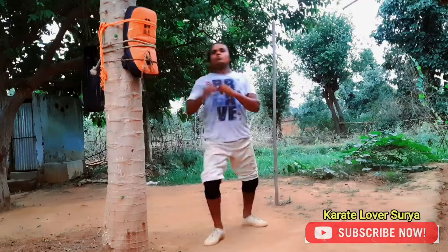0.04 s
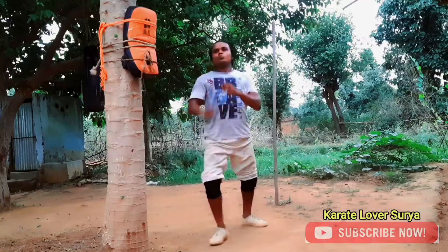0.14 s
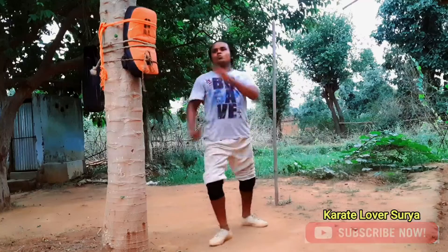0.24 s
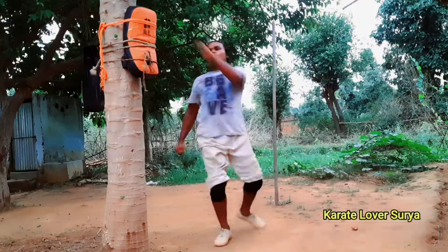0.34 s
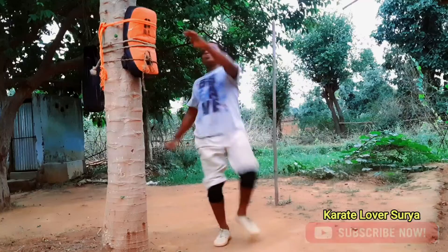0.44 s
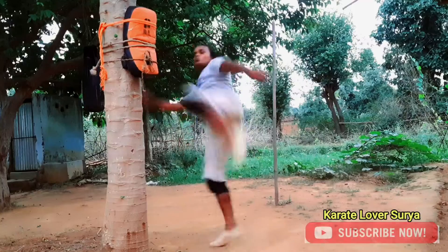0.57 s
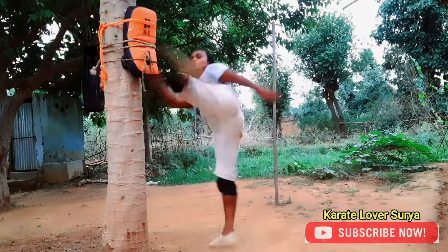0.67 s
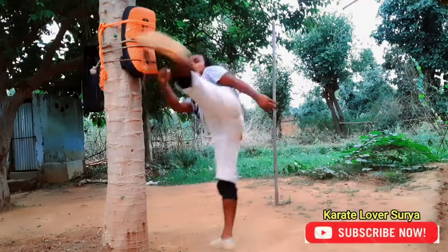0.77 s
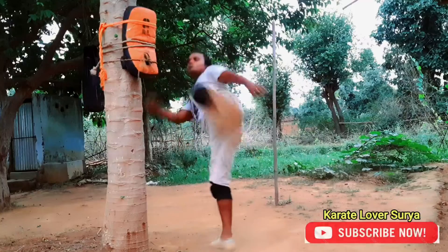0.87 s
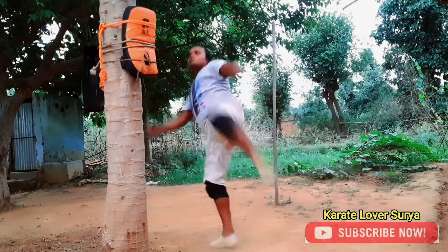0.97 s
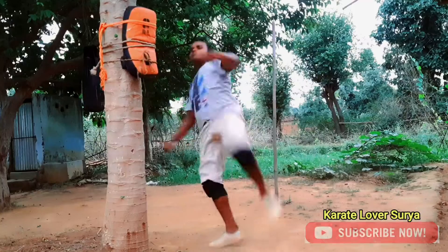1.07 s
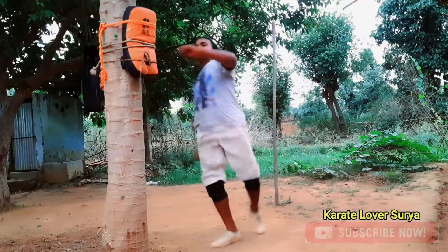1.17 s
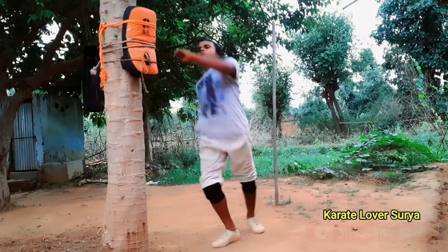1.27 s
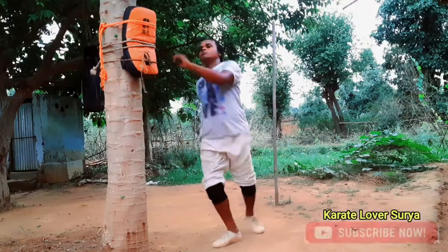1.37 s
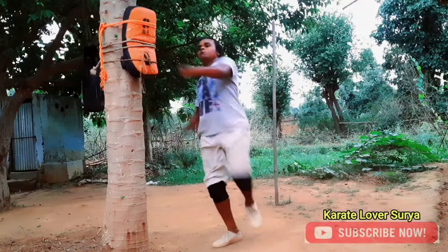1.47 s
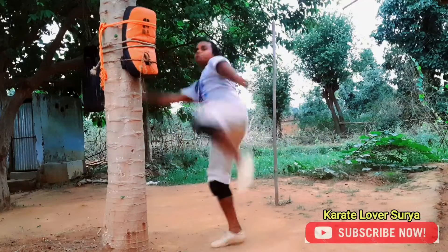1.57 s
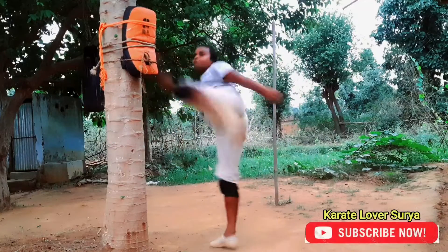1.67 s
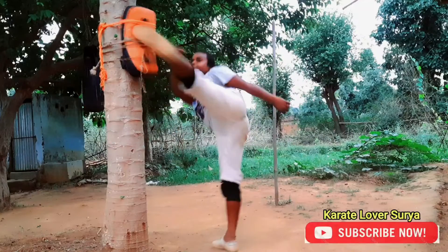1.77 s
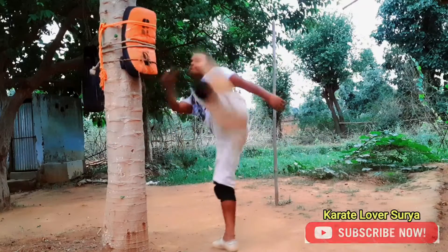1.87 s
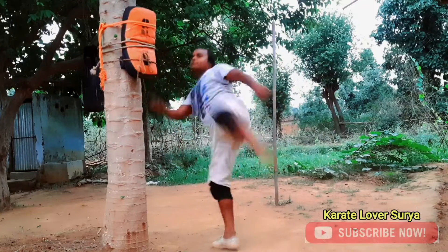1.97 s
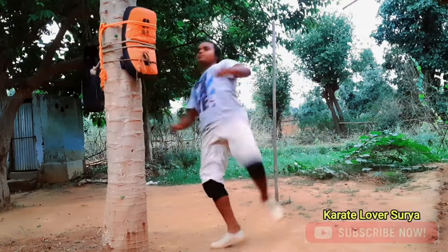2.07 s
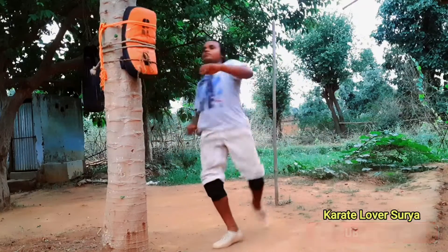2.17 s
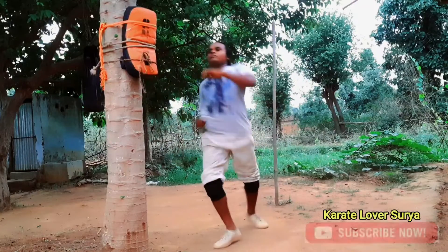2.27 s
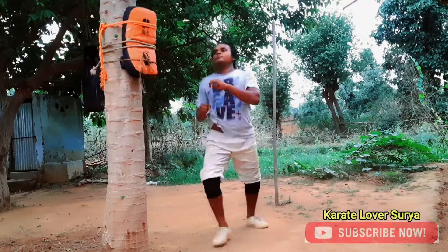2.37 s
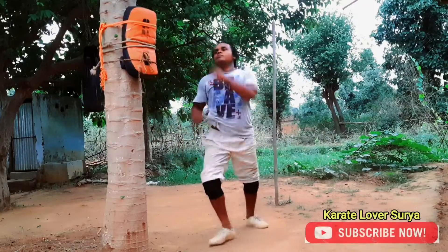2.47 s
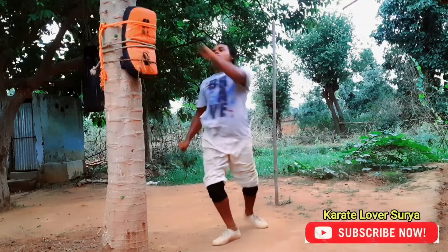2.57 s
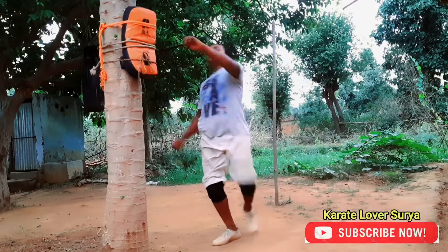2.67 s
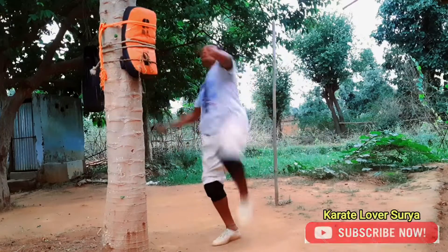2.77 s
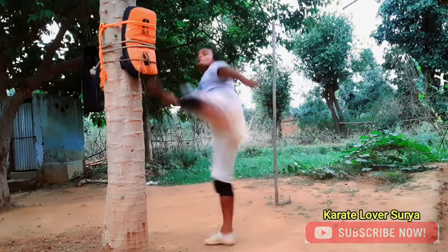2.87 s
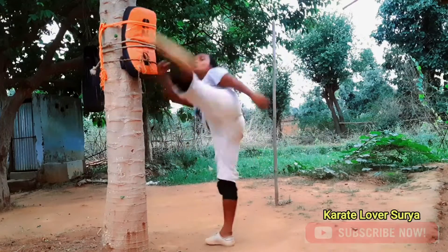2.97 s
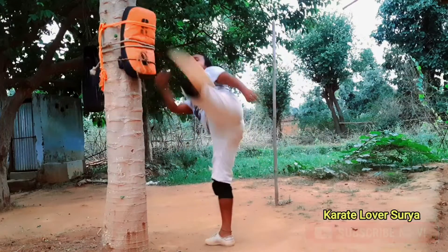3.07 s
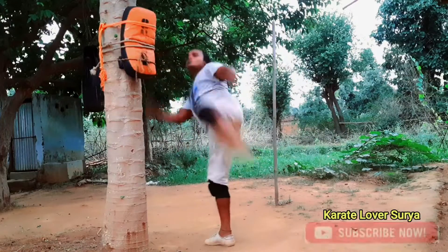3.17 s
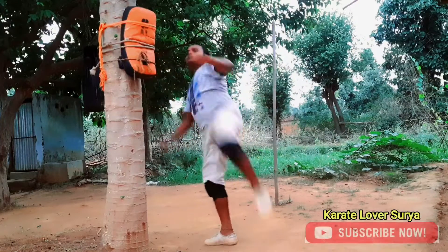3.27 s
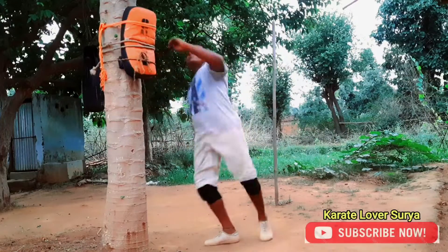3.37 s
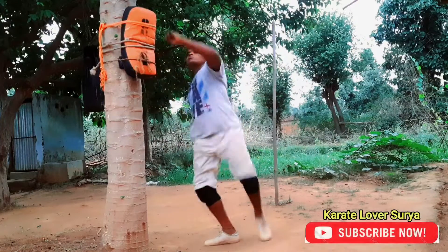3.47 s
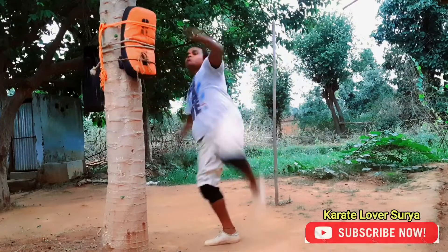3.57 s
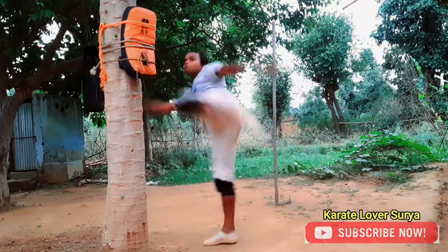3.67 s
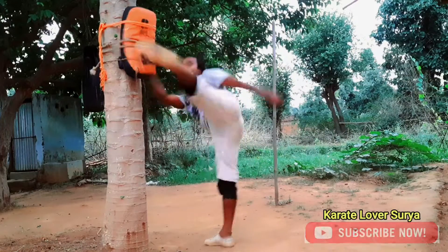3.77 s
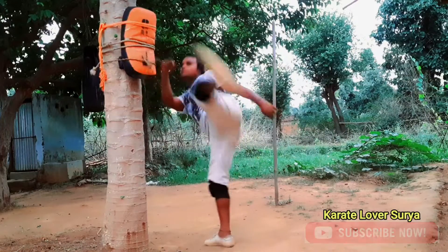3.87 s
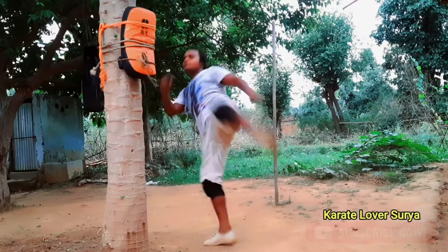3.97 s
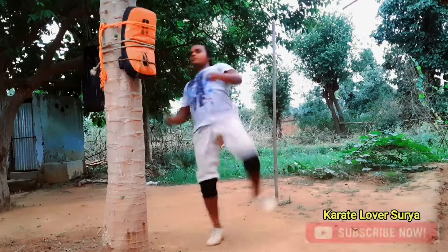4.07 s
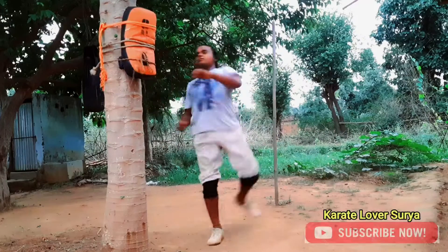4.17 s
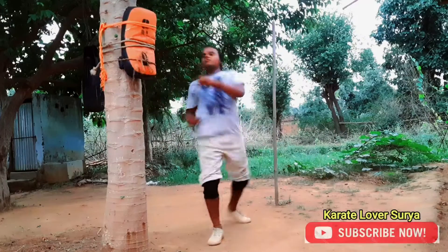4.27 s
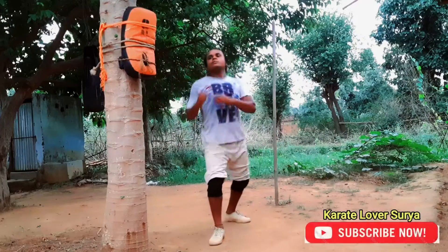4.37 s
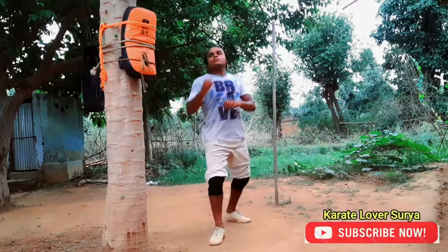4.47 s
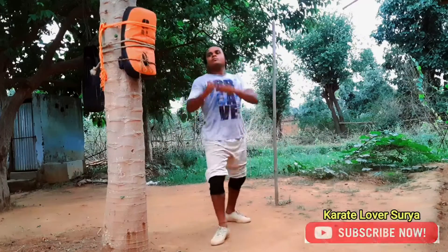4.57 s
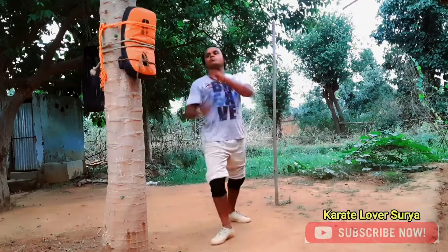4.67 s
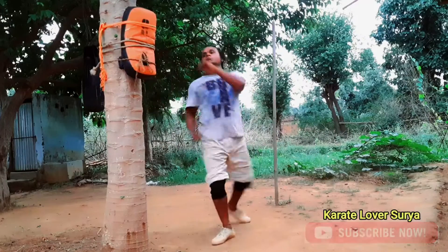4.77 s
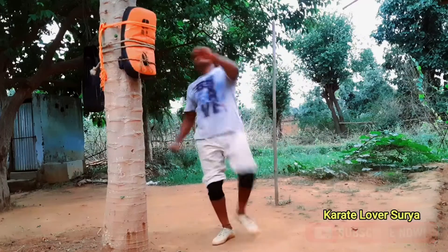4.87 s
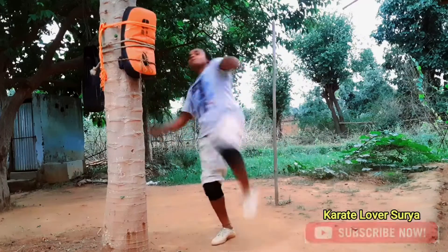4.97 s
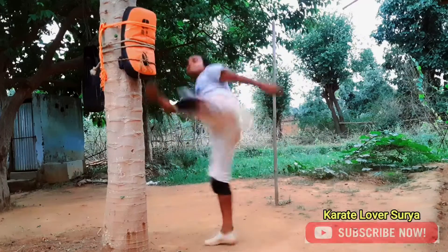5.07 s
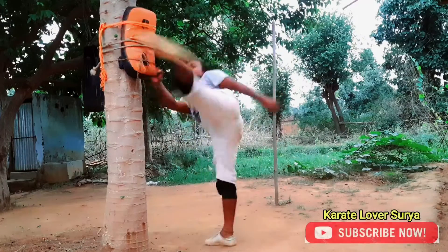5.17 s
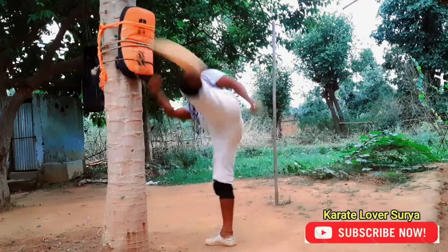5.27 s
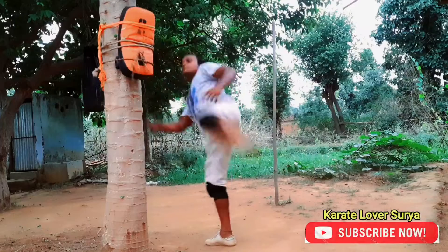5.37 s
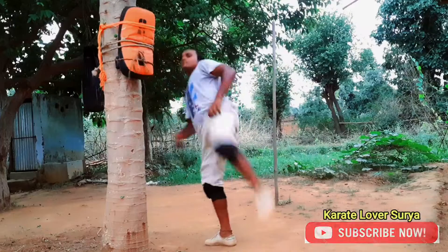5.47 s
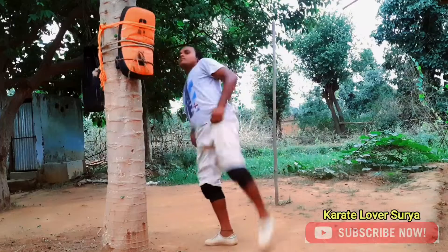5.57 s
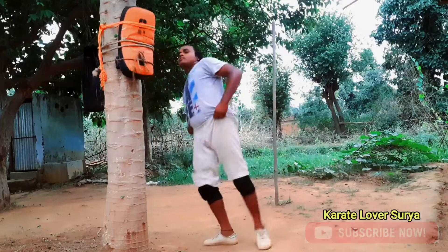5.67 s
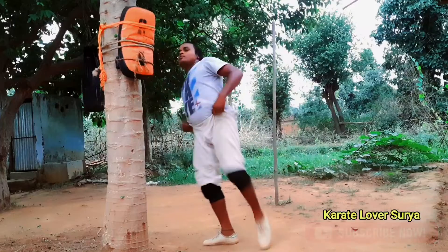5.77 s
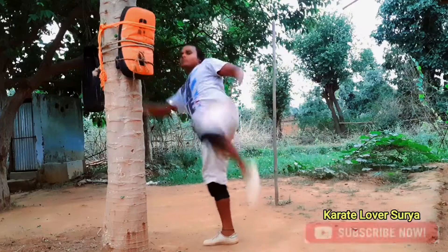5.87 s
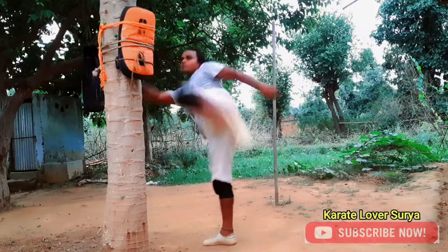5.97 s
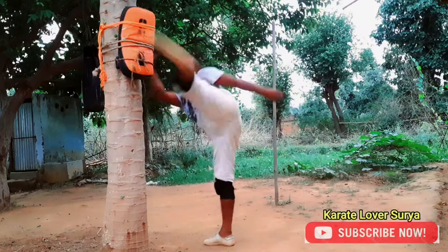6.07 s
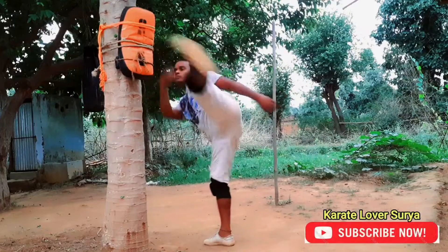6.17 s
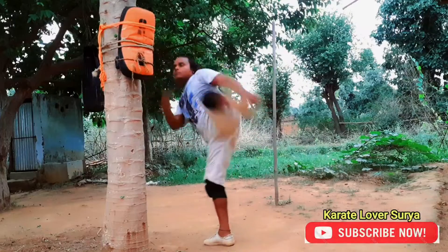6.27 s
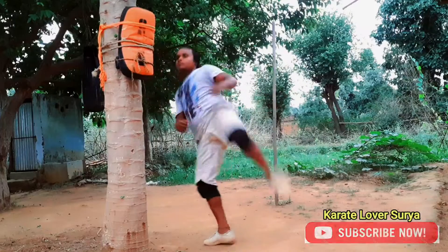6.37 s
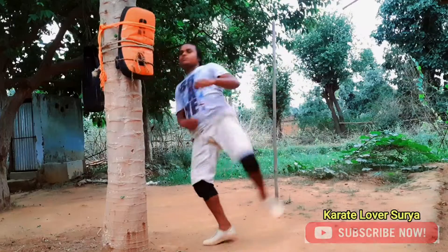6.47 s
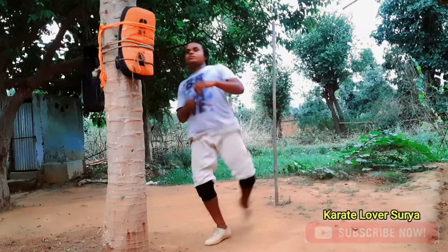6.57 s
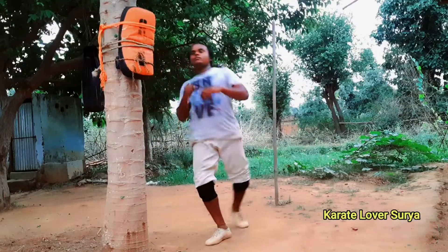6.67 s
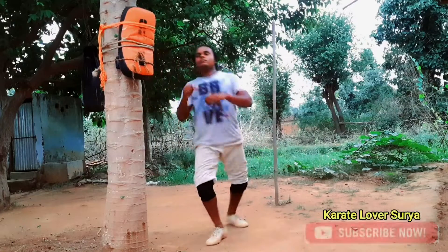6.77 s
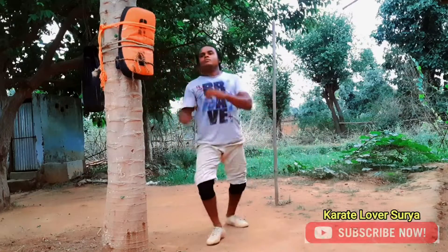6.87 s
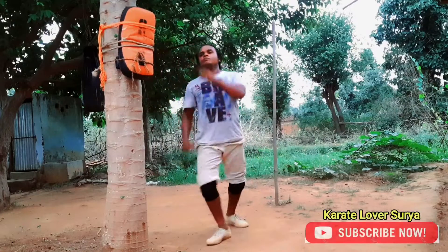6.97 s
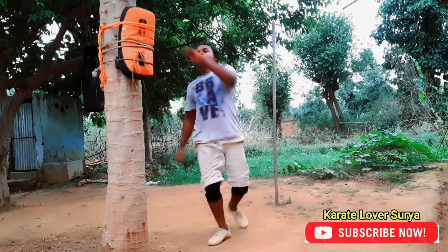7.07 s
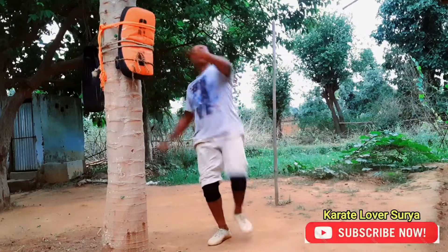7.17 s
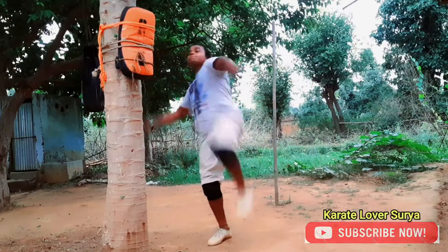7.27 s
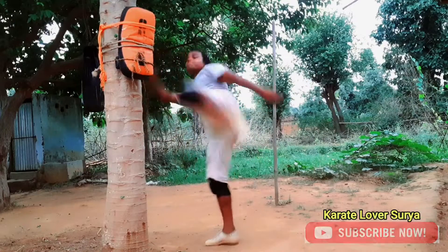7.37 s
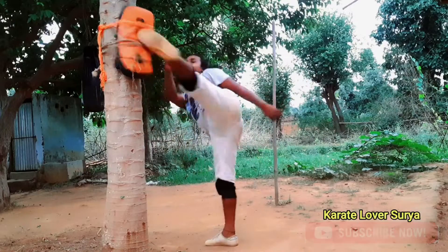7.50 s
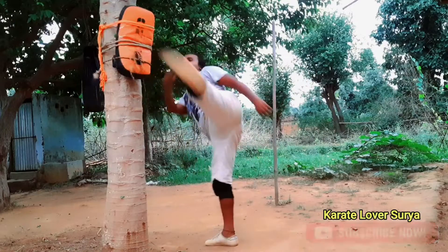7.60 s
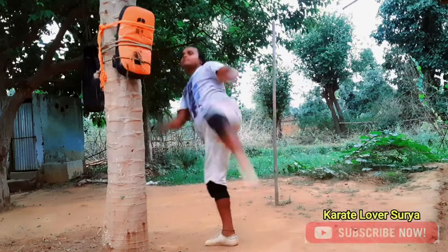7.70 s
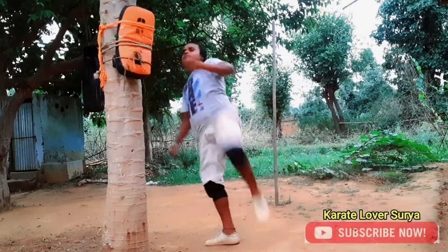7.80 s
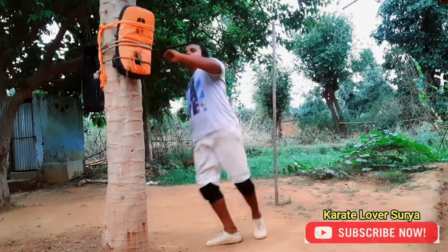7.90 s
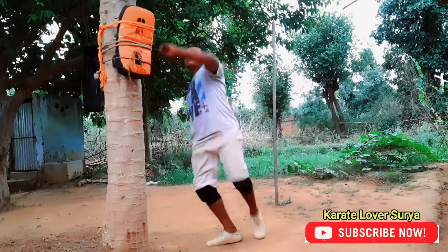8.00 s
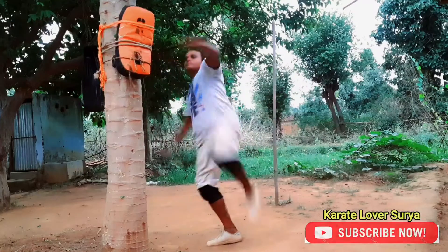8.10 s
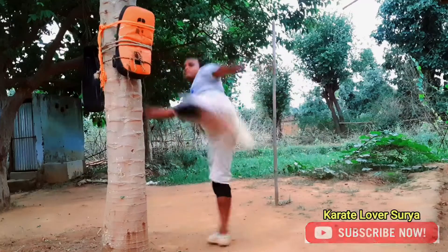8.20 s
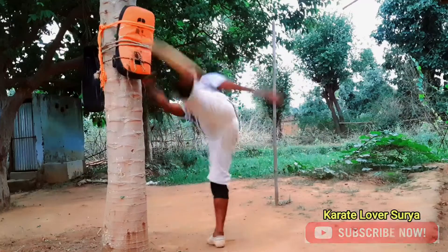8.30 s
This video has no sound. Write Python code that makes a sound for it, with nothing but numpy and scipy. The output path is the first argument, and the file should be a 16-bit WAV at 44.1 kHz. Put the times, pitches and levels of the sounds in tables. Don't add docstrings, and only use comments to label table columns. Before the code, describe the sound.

Seven hard, dull slaps of a bare foot on a roped stuffed pad, with gritty footwork between, over faint cicadas and distant birds.

```python
import sys
import numpy as np
from scipy import signal
from scipy.fft import rfft, irfft, next_fast_len
from scipy.io import wavfile
from scipy.ndimage import uniform_filter1d, map_coordinates

SR = 44100
rng = np.random.default_rng(int(sys.argv[2]) if len(sys.argv) > 2 else 0)


def generate_wav(signal):
    frames = np.transpose(np.atleast_2d(signal))
    scaled = np.clip(frames, -1, 1) * 32767
    pcm = np.round(scaled).astype(np.int16)
    wavfile.write(sys.argv[1], SR, pcm)


def decibels_to_gain(level_db):
    exponent = np.asarray(level_db, float) / 20
    return 10 ** exponent


N = 367794
T = np.arange(N) / SR
PORT_LAG = 3 / 44100
REACH_DB = 20
ROUNDING = 1.21

# start_s, slap_peak_db, snap_db, wall_echo_db, yard_db
KICK_TABLE = [
    (0.7688, -1.5, -28, -30, -16),
    (1.812, -2.5, -20.5, -26, -15),
    (3.042, -4, -19.5, -23.5, -16),
    (3.817, -5.5, -25, -5, -12.5),
    (5.2398, -4.5, -21, -38, -16),
    (6.129, -4.5, -14, -30, -10.5),
    (7.550, -7, -24, -21, -16),
]
# frequency_hz, left_right_likeness
PAD_SPREAD = [(60, 0.998), (150, 0.97), (400, .97), (800, 0.2), (3000, 0.2), (8000, 0.55)]
# frequency_hz, left_right_likeness
NEAR_LIKENESS = [(200, 0.6), (1000, 0.28), (4000, 0.38), (12000, 0.11)]


def unit(x):
    return x / np.sqrt(np.mean(x ** 2) + 1e-20)


def along(points, hz):
    f, v = np.transpose(points)
    return np.interp(np.log(hz + 1), np.log(f + 1), v)


def curves(rows):
    s, *cols = np.transpose(rows)
    return [np.interp(T, s, c, -140, -140) for c in cols]


def wobble(rate):
    return map_coordinates(rng.standard_normal(int(N * rate / SR) + 4), [T * rate])


def filtered(x, response):
    m = next_fast_len(x.shape[-1] + 8192)
    return irfft(rfft(x, m) * response(np.fft.rfftfreq(m, 1 / SR)), m)[..., :x.shape[-1]]


def ports(x, lag):
    return filtered(x, lambda hz: np.exp(1j * np.pi * hz * lag * np.array([[1], [-1]])))


def rush(spectrum, alike, lag, grain_db=0., rate=300, size=N):
    pair = rng.standard_normal((2, size)) * decibels_to_gain(grain_db * wobble(rate)[:size])
    turn = lambda hz: np.arccos(np.clip(along(alike, hz), -1, 1)) / 2
    shift = lambda hz: np.exp(1j * np.pi * hz * lag)
    gain = lambda hz: decibels_to_gain(along(spectrum, hz))
    left = filtered(pair, lambda hz: gain(hz) * shift(hz) * [np.cos(turn(hz)), np.sin(turn(hz))])
    right = filtered(pair, lambda hz: gain(hz) / shift(hz) * [np.cos(turn(hz)), -np.sin(turn(hz))])
    return unit(np.array([left.sum(0), right.sum(0)]))


def patchy(x, depth_db):
    z = signal.stft(x, nperseg=512)[2]
    field = uniform_filter1d(rng.standard_normal(z.shape[1:]), size=7, axis=0)
    field = uniform_filter1d(field, size=12, axis=1)
    return signal.istft(z * decibels_to_gain(depth_db * unit(field)), nperseg=512)[1][:, :N]


def ring(modes, hz, t, scatter_db):
    out = 0
    for ratio, db, t60 in modes:
        size, skew = rng.standard_normal(2)
        phase = np.minimum(.0009 * ratio * hz, .5) * np.sign(skew) * np.array([[1], [-1]])
        level = decibels_to_gain(db + scatter_db * size - 60 * t / t60)
        out = out + level * np.sin(2 * np.pi * ratio * hz * t + phase)
    return out


def stroke_loss_db(t, peak_s, rise_s, fall_s):
    away = np.maximum((peak_s - t) / max(rise_s, .004), (t - peak_s) / max(fall_s, .004))
    return REACH_DB * away ** ROUNDING


def add_at(out, start, x):
    out[:, start:][:, :x.shape[-1]] += x


def yard(size):
    # frequency_hz, density_db_per_hz
    colour = [(30, -14.5), (70, 1.5), (130, -6), (250, 1.5), (500, -1.5), (1000, -6), (2500, -12.5),
              (5000, -22), (8000, -26.5), (10000, -32), (14000, -27.5), (16000, -44)]
    # frequency_hz, t60_s
    decay = [(60, 0.36), (250, 0.26), (1000, 0.2), (4000, 0.26), (12000, 0.31)]
    noise = rush(colour, PAD_SPREAD, 0, grain_db=0.5, rate=31, size=size)
    hz, t, z = signal.stft(noise, SR, nperseg=512)
    z = z * decibels_to_gain(-60 * t / along(decay, hz)[:, None])
    tail = signal.istft(z, SR, nperseg=512)[1][:, :size]
    return tail * (1 - np.exp(-np.arange(size) / (0.0032 * SR)))


def quiet_air():
    # frequency_hz, density_db_per_hz
    spectrum = [(25, -7.5), (60, -1), (120, -0.5), (200, -6.5), (500, -15), (1000, -20), (1800, -26),
                (3500, -25.5), (4600, -12), (7000, -7.5), (9000, -20.5), (13000, -22.5), (15500, -25.5),
                (16200, -61)]
    # frequency_hz, left_right_likeness
    likeness = [(60, -0.049), (130, 0.13), (290, 0.058), (640, 0.24), (1410, 0.095), (3100, 0.3),
                (6820, -0.26), (15000, 0.15)]
    return decibels_to_gain(-61.0 + 0.41 * wobble(2.7)) * patchy(rush(spectrum, likeness, 0), depth_db=2.5)


def singers(hz, width_hz, grain_db):
    band = [(1, 0), (width_hz / 2, -3), (width_hz, -14), (2 * width_hz, -40), (4 * width_hz, -120)]
    turn = 2 * np.pi * np.cumsum(hz + 0 * T) / SR
    in_phase = rush(band, [(1, 0.26)], 0, grain_db) * np.cos(turn)
    return in_phase + rush(band, [(1, 0.27)], 0, grain_db) * np.sin(turn)


def insects():
    # time_s, chorus_db
    swells = [
        (0.0, -56),
        (0.69, -54),
        (1.07, -60),
        (3.04, -57),
        (3.16, -63),
        (4.9, -60.5),
        (5.27, -59),
        (6.99, -60.5),
        (7.55, -57),
        (8.34, -59),
    ]
    # pitch_hz, level_db
    cricket = (7700, -66)
    # time_s, chirp_count
    chirp_counts = [(0, -.05), (4.8, 48.4), (5.91, 59), (8.34, 83.2)]
    db = np.interp(T, *np.transpose(swells))
    chorus = decibels_to_gain(db - 0.5 + 1.3 * wobble(25)) * singers(5340, width_hz=500, grain_db=0.5)
    upper = decibels_to_gain(-72.0 + 1.5 * wobble(6)) * singers(6250, width_hz=130, grain_db=-2.0)
    hz, chirp_db = cricket
    gate = np.clip(.3 + 2.5 * np.cos(2 * np.pi * curves(chirp_counts)[0]), .1, 1)
    chirps = decibels_to_gain(chirp_db + 2 * wobble(5)) * gate * singers(hz, width_hz=140, grain_db=.5)
    return chorus + upper + chirps


def note(s, length, hz, first_db, octave_db, sag):
    peak, edge_db = 0.45, 5
    return [(s, hz, first_db - edge_db, octave_db - edge_db),
            (s + peak * length, hz * (1 - sag / 8), first_db, octave_db),
            (s + length, hz * (1 - sag), first_db - edge_db, octave_db - edge_db)]


def roosters():
    # time_s, pitch_hz, fundamental_db, octave_db
    long_crow = [(.27, 1010, -68, -62), (.44, 1036, -52, -57), (.48, 1036, -50, -57),
                 (.56, 1044, -55.5, -54), (.63, 1050, -58, -60), (.74, 1055, -52, -49),
                 (.92, 1025, -63, -56), (1.05, 1014, -76, -70), (1.3, 985, -66, -64.5),
                 (1.42, 955, -74, -55), (1.58, 938, -74, -59), (1.66, 920, -85, -68)]
    # start_s, length_s, pitch_hz, fundamental_db, octave_db
    held = [(-.02, 0.33, 946, -88, -58), (0.31, 0.1, 1233, -61, -55), (5.8, 0.22, 1246, -100, -73.5),
            (2.71, .075, 1180, -100, -73), (2.783, .05, 1013, -100, -73), (2.96, 0.12, 1150, -100, -67),
            (7.07, 0.12, 1036, -76, -91.5)]
    # start_s, length_s, pitch_hz, fundamental_db, octave_db
    falling = [
        (0.561, .22, 1225, -54, -53),
        (6.76, 0.42, 1145, -69, -91),
    ]
    crow = np.zeros(N)
    for rows in [long_crow] + [note(*row, 0) for row in held] + [note(*row, 0.05) for row in falling]:
        hz, first_db, octave_db = curves(rows)
        turn = 2 * np.pi * np.cumsum(hz * (1 + .009 * wobble(60))) / SR
        crow += decibels_to_gain(first_db - 1 + 3.5 * wobble(50)) * np.sin(turn)
        crow += decibels_to_gain(octave_db + 3.2 * wobble(50)) * np.sin(2 * turn + .6 * wobble(60))
    return crow


def cuckoo():
    # middle_s, length_s, pitch_hz, level_db
    hoots = [(2.595, .12, 432, -54), (2.99, .15, 425, -53), (3.375, .13, 416, -61), (3.68, .09, 395, -61),
             (3.75, .07, 392, -62), (4.227, .1, 411, -67), (5.468, .14, 432, -53), (5.89, .13, 428, -53),
             (6.275, .13, 422, -52), (6.66, .12, 410, -53)]
    out = np.zeros(N)
    for s, length, hz, db in hoots:
        u = np.clip((T - s) / length, -.5, .5)
        bend = 1 + .045 * np.sin(9.5 * u)
        swell = decibels_to_gain(db - .8 + 1.6 * wobble(50)) * np.abs(np.cos(np.pi * u)) ** .8
        out += swell * np.sin(2 * np.pi * np.cumsum(hz * bend) / SR)
    return out


def small_bird():
    # time_s, level_db
    tweets = [
        (4.54, -73),
        (7.01, -66),
        (7.315, -65.5),
        (7.64, -66),
    ]
    out = np.zeros(N)
    for s, db in tweets:
        u = np.clip((T - s) / 0.053, -.5, .5)
        rising = np.sin(2 * np.pi * np.cumsum(4400 - 900 * (.5 - u) ** 2) / SR)
        out += decibels_to_gain(db + 3) * np.cos(np.pi * u) * rising
        lead = np.clip((T - s + .05) / .04, -.5, .5)
        out += decibels_to_gain(db) * np.cos(np.pi * lead) * np.sin(2 * np.pi * 4150 * T)
    return out


def birds():
    crow = roosters()
    hoot = cuckoo() + small_bird()
    trees = rng.standard_normal((2, SR // 5)) * decibels_to_gain(-60 * T[:SR // 5] / .15)
    trees = trees / np.linalg.norm(trees[0])
    far = signal.fftconvolve((1.7 * crow + hoot)[None], trees, axes=1)[:, :N]
    return ports(crow, 0.000055) + ports(hoot + decibels_to_gain(-6) * far, 4e-5)


def movement():
    # peak_s, rise_s, fall_s, scuff_db, grit_over_scuff_db
    pushes = [(0.377, 0.068, 0.069, -44, -13), (0.441, 0.046, 0.058, -45, 0),
              (0.611, 0.094, 0.18, -46, -4.5), (0.69, 0.089, 0.043, -46, -9.5),
              (1.652, 0.032, .2, -49.5, -10), (1.688, 0.062, 0.13, -51.5, -4),
              (2.865, 0.039, 0.19, -49.5, -4), (2.917, 0.054, 0.057, -35.5, -18),
              (3.78, 0.079, 0.14, -53, -6.5), (5.077, 0.038, 0.17, -44.5, -8.5),
              (6.087, 0.11, 0.041, -52.5, -6), (7.367, 0.036, 0.16, -50, -4.5),
              (7.42, 0.069, 0.089, -41.5, -10.5), (8.261, 0.081, 0.086, -46, -10)]
    # peak_s, rise_s, fall_s, scuff_db, grit_over_scuff_db
    returns = [(0.06, 0.34, 0.18, -55, -6), (0.27, 0.28, 0.11, -71.5, 7), (1.2, 0.43, 0.22, -51.5, -4.5),
               (1.478, 0.23, 0.12, -67, -2.5), (2.172, 0.14, 0.19, -50, -7), (2.39, 0.27, 0.13, -56.5, -8),
               (2.587, 0.019, 0.21, -58, -3), (3.415, 0.15, 0.081, -45, -12),
               (3.466, 0.16, 0.098, -55.5, -8), (3.545, 0.055, 0.038, -53, -12),
               (4.139, 0.47, 0.12, -50, -7), (4.3, .006, 0.16, -57.5, -15.5), (4.4, .2, 0.069, -69, -1.5),
               (4.854, .06, 0.069, -64, -7), (5.6, 0.64, 0.2, -69.5, 9.5), (5.656, 0.0075, 0.2, -45.5, -8),
               (5.819, 0.28, 0.058, -64, 0), (6.593, 0.1, 0.086, -46.5, -8.5),
               (6.828, 0.45, 0.13, -57, -7.5), (7.06, 0.061, 0.23, -65, -3), (7.879, 0.94, 0.16, -74, 8.5),
               (7.95, 0.16, 0.077, -52, -9.5), (8.044, 0.26, 0.076, -51.5, -6.5)]
    swing_levels = [-60, -50, -74, -46.5, -62, -60, -77]
    # frequency_hz, density_db_per_hz
    scuff_colour = [(88, -50), (150, -18.5), (326, -2.5), (431, -7), (618, 0), (1000, -3), (1700, -8),
                    (2200, -10), (2860, -39), (4840, -120)]
    # frequency_hz, density_db_per_hz
    grit_colour = [(1100, -13), (1800, -5.5), (3000, -6.5), (5000, -8.5), (7000, -15.5), (9000, -22)]
    # frequency_hz, density_db_per_hz
    swish_colour = [(3530, -31.5), (6000, -4.5), (6670, -5), (8230, -0.5), (10300, -14), (13000, -8),
                    (15400, -21), (15800, -25)]
    cloth_db, cloth_follows = -4.5, 1.1
    swings = [(s - .006, 0.027, .01, db, -20) for (s, *_), db in zip(KICK_TABLE, swing_levels)]
    settles = [(s + 0.073, .1, 0.35, db - 50.5, -4) for s, db, *_ in KICK_TABLE]
    power = np.zeros((3, N))
    for s, rise, fall, db, grit_db in [*pushes, *returns, *swings, *settles]:
        shares_db = np.array([[0], [grit_db], [cloth_db + cloth_follows * grit_db]])
        power += decibels_to_gain(2 * (db - stroke_loss_db(T, s, rise, fall))) * decibels_to_gain(2 * shares_db)
    scuff, grit, swish = np.sqrt(power)
    drag = scuff * rush(scuff_colour, NEAR_LIKENESS, PORT_LAG / 2, grain_db=2.0, rate=150)
    sand = decibels_to_gain(8.0) * grit * rush(grit_colour, NEAR_LIKENESS, PORT_LAG / 2, grain_db=2, rate=360)
    cloth = decibels_to_gain(6.5) * swish * rush(swish_colour, NEAR_LIKENESS, PORT_LAG / 2, grain_db=3.0, rate=540)
    return patchy(drag + sand + cloth, depth_db=1.5)


def stones():
    # start_s, peak_db, pitch_hz
    flicks = [(.4155, -39, 4000), (1.057, -31, 3000), (1.138, -34, 4000), (1.174, -36, 2000),
              (1.191, -31, 4500), (1.638, -46, 4000), (2.263, -36, 6000), (2.269, -23.5, 2200),
              (2.582, -41, 2490), (3.41, -38, 3000), (3.764, -47, 3000), (3.778, -38, 4000),
              (5.053, -38, 3020), (6.835, -31, 4000), (7.349, -38, 3470), (7.414, -32, 3000),
              (7.895, -42, 2930), (7.815, -44, 3600), (8.312, -42, 3500), (6.17, -30, 6500),
              (7.965, -32, 2500)]
    out, t = np.zeros((2, N + SR)), np.arange(400) / SR
    for s, db, hz in flicks:
        tone = np.sin(2 * np.pi * hz * t) + .4 * rng.standard_normal(400)
        click = decibels_to_gain(db - 60 * t * hz / 2.8) * tone
        add_at(out, round(s * SR), ports(click, PORT_LAG / 2))
    return out[:, :N]


def foot_hollows():
    # peak_s, rise_s, fall_s, level_db, pitch_hz
    drags = [(.06, .06, 0.17, -59, 690), (.372, 0.035, .04, -42.5, 623), (.62, .06, 0.091, -46.5, 810),
             (1.15, 0.077, 0.052, -54, 730), (1.25, 0.0049, 0.051, -43.5, 850),
             (1.685, 0.055, 0.049, -45, 855), (2.18, 0.047, 0.19, -51, 510),
             (2.92, 0.052, 0.056, -37.5, 697), (3.384, .005, 0.058, -44, 800),
             (4.14, 0.088, 0.07, -48, 649), (5.08, 0.043, 0.09, -46.5, 800),
             (6.59, 0.055, 0.063, -50.5, 750), (7.41, 0.053, 0.058, -40, 1530),
             (7.92, 0.065, 0.052, -48, 1700), (7.93, 0.071, 0.055, -53, 603),
             (8.04, .03, 0.028, -49.5, 1900), (8.26, 0.049, 0.073, -45.5, 580)]
    out, t = np.zeros((2, N + SR)), np.arange(SR // 2) / SR
    for s, rise, fall, db, hz in drags:
        width = .45 * hz
        cavity = lambda f: 1j * f * width / (hz * hz - f * f + 1j * f * width)
        sand = rush([(1, 0)], NEAR_LIKENESS, PORT_LAG / 2, grain_db=1.5, rate=200, size=len(t))
        hollow = unit(filtered(sand, lambda f: cavity(f) ** 2))
        add_at(out, round(s * SR) + SR // 4, decibels_to_gain(db - stroke_loss_db(t, .25, rise, fall)) * hollow)
    return out[:, SR // 2:][:, :N]


def footfalls():
    # start_s, peak_db, heel_thud_db, grit_db, t60_s
    steps = [(0.421, -31.5, -9, -15, 0.047), (1.247, -36, -20, -12, 0.038),
             (2.2616, -31.5, -14.5, -10, 0.097), (2.305, -42.5, 0, -2, 0.073),
             (2.377, -42, -8.5, -21, 0.029), (2.702, -47, -13.5, -15, 0.064), (3.382, -42, -19, -21, 0.045),
             (3.4239, -22.5, -29, -27, 0.043), (3.451, -35, -21, -3, 0.058),
             (4.292, -37.5, -24, -25.5, 0.036), (5.569, -49.5, -29.5, -7.5, 0.023),
             (5.588, -48.5, -32, 0, 0.022), (5.623, -51, -30, -4, 0.023), (5.649, -32, -25.5, -4.5, 0.084),
             (6.688, -38, -28.5, -26, 0.073), (6.736, -45, -32, -11.5, 0.069),
             (7.043, -74.5, -22.5, -10.5, 0.052), (7.082, -55.5, -10, -2, 0.044),
             (7.9646, -23.5, -10, -25.5, 0.045)]
    # frequency_hz, width_hz, level_db
    soil_modes = [(279, 95, -2), (670, 184, 2), (960, 184, 6.5), (1860, 1300, -4)]
    heel_s, heel_hz = .0065, 380
    out, t = np.zeros((2, N + SR)), np.arange(SR // 4) / SR
    soil = lambda f: sum((-1) ** k * decibels_to_gain(db) * 1j * f * w / (c * c - f * f + 1j * f * w)
                         for k, (c, w, db) in enumerate(soil_modes))
    for s, db, thud_db, grit_db, t60 in steps:
        puff = rng.standard_normal((2, len(t))) * decibels_to_gain(-60 * t / np.clip(t60, .01, .3))
        tap = decibels_to_gain(15 - 60 * t / .002)
        thud = decibels_to_gain(thud_db - 14 - 60 * t / 0.077) * np.sin(2 * np.pi * 190 * t)
        strike = decibels_to_gain(1.5) * filtered(puff[0] + tap, soil) + thud + decibels_to_gain(grit_db + 7.5) * np.gradient(puff[1])
        heel_down = filtered(-strike, lambda f: 1 / (1 + 1j * f / heel_hz) ** 2)
        heel_down = np.roll(heel_down, round(heel_s * SR * (1 + 0.061 * puff[0, 0])))
        step = strike + decibels_to_gain(7.5 + puff[1, 0]) * heel_down
        add_at(out, round(s * SR), decibels_to_gain(db - 6.5) * (ports(step, PORT_LAG / 2) + decibels_to_gain(-11.0) * yard(len(t))))
    return out[:, :N]


def toe_patter(s, t):
    # time_s, level_db
    touches = [(0.769, -19), (0.7705, -15), (0.771, -14.5), (0.7735, -17.5), (.7747, -23), (.776, -21),
               (0.7778, -23.5), (1.8121, -12), (1.814, -20), (1.815, -14.5), (1.817, -22.5), (1.8215, -24),
               (1.824, -23), (3.043, -14), (3.0454, -29.5), (3.0471, -17.5), (3.048, -31), (3.8185, -24.5),
               (3.82, -11), (3.8214, -24.5), (3.823, -14), (3.8243, -12.5), (3.829, -28), (5.24, -22),
               (5.2421, -26), (5.2433, -19.5), (5.2462, -21), (5.2503, -24.5), (6.13, -7), (6.1336, -12.5),
               (6.1337, -12.5), (6.1346, -19.5), (6.1363, -20), (6.1397, -11.5), (6.1418, -20.5),
               (7.5504, -24), (7.5524, -19), (7.555, -24.5), (7.5568, -22)]
    return sum(decibels_to_gain(db - 2.5 - 60 * np.maximum(t - at + s, 0) / 0.0014) * (t > at - s)
               for at, db in touches if abs(at - s) < .1)


def struck_face(touch, face_db, rim_db, flatten):
    face_hz = [700, 990, 1475, 1945, 2380, 2794, 3650]
    face_t60 = [.06, 0.052, 0.04, 0.048, 0.04, 0.069, 0.022]
    # pitch_hz, t60_s
    rim_modes = [(856, .06), (1720, .045)]
    modes = [*zip(face_hz, face_db, face_t60)]
    modes += [(hz, db, t60) for (hz, t60), db in zip(rim_modes, rim_db)]
    return -ring(modes, 1, touch, scatter_db=1) * (1 - np.exp(-touch / (0.4 * flatten)))


def trunk_sway(late, bends_db, trunk_hz):
    # pitch_hz, signed_strength, t60_s
    modes = [(63, -0.56, .13), (130.8, 0.46, 0.11), (71.96, -.07, .3), (100.6, .1, 0.21),
             (213, 0.054, 0.17)]
    sway = sum(g * decibels_to_gain(db - 60 * late / t60) * np.sin(2 * np.pi * hz * trunk_hz / 72 * late)
               for (hz, g, t60), db in zip(modes, bends_db))
    return sway * (1 - np.exp(-late / 0.0013))


def pad_body(t, late, blow, fill_hz, fill_db, tighten):
    # pitch_ratio, level_db, t60_s
    air_modes = [(.86, -15.5, .06), (1, 3.5, .07), (1.3, -13.5, .05)]
    # pitch_ratio, level_db, t60_s
    cover_modes = [(1, 2, 0.089), (1.25, -4.5, 0.058)]
    _, pad_hz, pad_db, cover_hz, cover_db = blow
    tighten_s = 0.022
    taut = t + tighten * (t - tighten_s * (1 - np.exp(-t / tighten_s)))
    muffle = decibels_to_gain(cover_db - 60 * np.maximum(t - .012, 0) / 0.04)
    inside = decibels_to_gain(pad_db) * ring(air_modes, pad_hz, late, scatter_db=0.0)
    cover = muffle * ring(cover_modes, cover_hz, taut, scatter_db=0.0)
    return inside + cover + ring([(0.98, fill_db, 0.11)], fill_hz, late, scatter_db=0)


def wall_echo(x, db, delay_s):
    return decibels_to_gain(db) * np.roll(x[::-1], round(delay_s * SR), 1)


def kicks():
    # frequency_hz, density_db_per_hz
    slap_colour = [(290, -34.5), (500, -4.5), (790, -3), (1200, -6.5), (1430, -4.5), (2430, -6),
                   (3080, -14.5), (4480, -18), (6000, -30), (7800, -55), (13200, -120)]
    # frequency_hz, density_db_per_hz
    snap_colour = [(2350, -39), (4000, -0.5), (4450, -0.5), (6500, -12.5), (8250, -3.5), (9790, -15.5),
                   (14600, -11), (16500, -35)]
    # thump_db, pad_hz, pad_db, cover_hz, cover_db
    blows = [(-5, 256, -8.5, 431, -12), (-6.5, 242, -18.5, 571, -5.5), (-10.5, 258, -8, 410, -17),
             (-12, 246, -8.5, 438, 3), (-9, 258, -6, 550, -8), (-9, 260, -7, 535, -6),
             (-13, 307, -15, 507, -11)]
    face_levels = [(-10.5, -12, -16.5, -33, -15, -18, -34), (-22, -15.5, -19.5, -19, -22.5, -31.5, -22.5),
                   (-15, -17.5, -11.5, -17.5, -36, -41.5, -31.5),
                   (-15.5, -10.5, -13.5, -24.5, -11.5, -22, -35),
                   (-29, -12.5, -25, -18, -20.5, -28.5, -29.5), (-18.5, -16, -9.5, -16, -11, -26.5, -25.5),
                   (-35, -22, -22, -21, -26, -33, -43)]
    flatten_times = [.0015, 0.0015, 0.0029, 0.003, 0.002, 0.00031, 0.0011]
    # delay_s, sharpness_s, level_db
    first_touches = [(.0002, .00012, -14), (.0003, .00018, -2), (.0009, .00015, -3), (.0005, .0002, -20),
                     (.0004, .00015, -12), (.0011, .00035, -2), (.0003, .00015, -8)]
    # quick_sway_db, slow_sway_db, stuffing_hz, stuffing_db, ring_echo_db
    sways = [(-3, 0, 340, -13, -20), (-4, -1, 305, -15, -13), (1, 0.5, 318, -20, -22),
             (-2.5, 0.5, 307, -24, -19.5), (-0.5, -2.5, 345, -13.5, -22), (-2, 1.5, 323, -12.5, -16),
             (-0.5, 2, 340, -19, -20)]
    stretches = [.03, 0.11, .03, .08, .03, .03, .03]
    # low_rim_db, high_rim_db, bark_ring_db, stuffing_delay_s, trunk_hz
    rims = [(-30, -22, 0, .0045, 74), (-20, -22, -6, .005, 71), (-20, -22, -3, .005, 71),
            (-30, -22, 6, .006, 71), (-30, -22, 3, .0058, 73), (-14, -20, -12, .0048, 70),
            (-28, -28, 0, .0055, 72)]
    contact_s = 0.0057
    wall_s, corner_s = .0535, .044
    out, t = np.zeros((2, N + SR)), np.arange(SR // 2) / SR
    per_kick = zip(KICK_TABLE, blows, face_levels, flatten_times, first_touches, sways, stretches, rims)
    for kick, blow, face_db, flatten, first, sway, tighten, rim in per_kick:
        s, db, snap_db, wall_db, yard_db = kick
        thump_db = blow[0]
        wait, sharp, first_db = first
        quick_db, slow_db, fill_hz, fill_db, back_db = sway
        *rim_db, bark_db, squeeze, trunk_hz = rim
        slap = rush(slap_colour, PAD_SPREAD, PORT_LAG, grain_db=2.5, rate=900, size=len(t))
        snap = rush(snap_colour, PAD_SPREAD, PORT_LAG, grain_db=2.5, rate=1200, size=len(t))
        press = decibels_to_gain(-60 * np.maximum(t - contact_s, 0) / 0.048) * (1 - np.exp(-(t / flatten) ** 2))
        touch = np.maximum(t - wait, 0)
        u = touch / sharp
        crack = ports(-u * np.exp(1 - u), PORT_LAG)
        skin = (decibels_to_gain(-13.0) * slap + decibels_to_gain(snap_db) * snap * decibels_to_gain(-60 * t / 0.15)) * press + decibels_to_gain(first_db) * crack
        patter = toe_patter(s, t)
        face = struck_face(touch, face_db, rim_db, flatten)
        late = np.maximum(t - squeeze, 0)
        thump = trunk_sway(late, [0, quick_db, slow_db, slow_db, bark_db], trunk_hz)
        body = pad_body(t, late, blow, fill_hz, fill_db, tighten)
        push = thump * decibels_to_gain([[.3], [-.3]]) + body * (1 - np.exp(-t / 0.0032))
        push = decibels_to_gain(thump_db + 4.0) * push
        slap_out = decibels_to_gain(-8.5) * slap * press * decibels_to_gain(-60 * t / .03) + decibels_to_gain(3) * patter * (snap + slap)
        echo = wall_echo(slap_out, wall_db, wall_s)
        rings_out = decibels_to_gain(thump_db + 5.0) * body * (1 - np.exp(-t / .004)) + face
        back = wall_echo(rings_out, back_db, corner_s)
        surface = decibels_to_gain(db) * (skin + echo + decibels_to_gain(yard_db) * yard(len(t)))
        contacts = patter * (snap + 0.35 * slap)
        add_at(out, round(s * SR), surface + push + face + back + contacts)
    return out[:, :N]


def scene():
    background = quiet_air() + insects() + birds()
    feet = movement() + stones() + foot_hollows() + footfalls()
    return background + feet + kicks()


def band_limit(x):
    return signal.sosfilt(signal.butter(12, 16800, fs=SR, output="sos"), x)


def record(dry):
    # frequency_hz, gain_db
    mic_top = [(15300, 0), (15700, -16), (16600, -20), (16900, -120)]
    x = signal.sosfilt(signal.butter(2, 35, "highpass", fs=SR, output="sos"), dry)
    x = x / (1 + np.abs(x / .97) ** 6) ** (1 / 6)
    return band_limit(filtered(x, lambda hz: decibels_to_gain(along(mic_top, hz))))


dry = scene()
out = record(dry)
generate_wav(out)
```